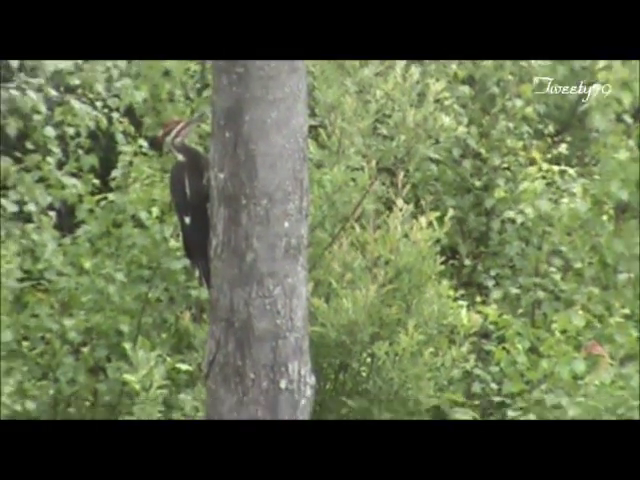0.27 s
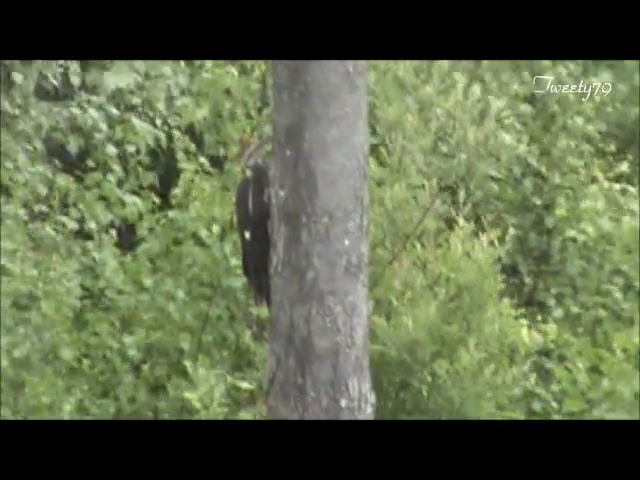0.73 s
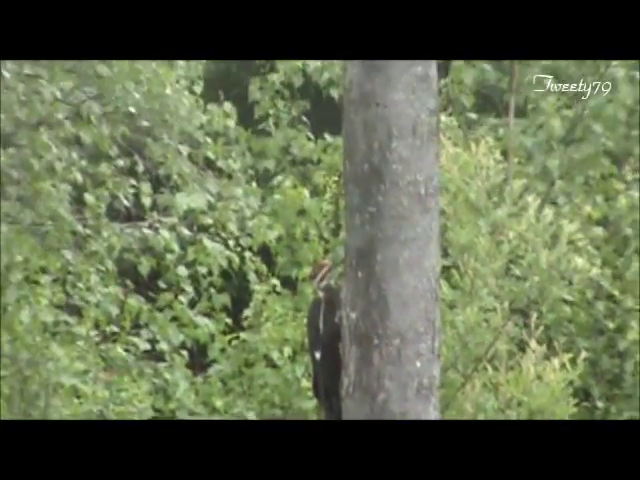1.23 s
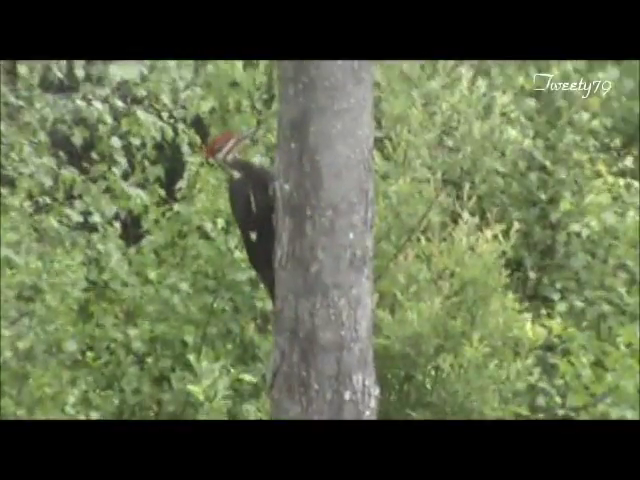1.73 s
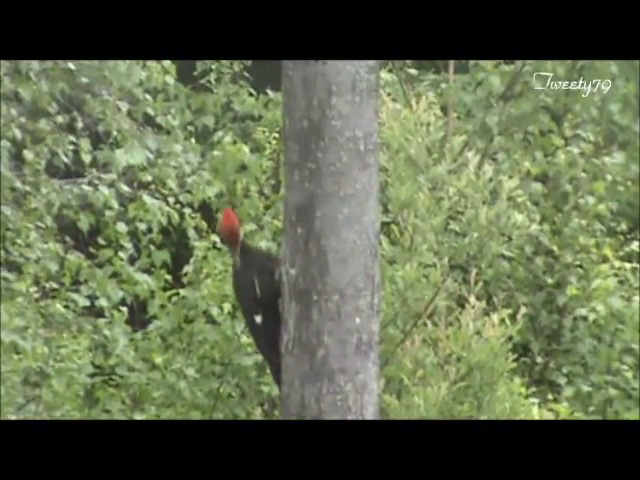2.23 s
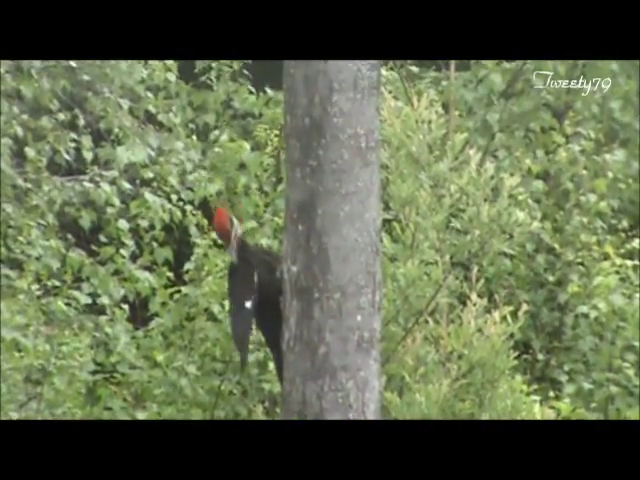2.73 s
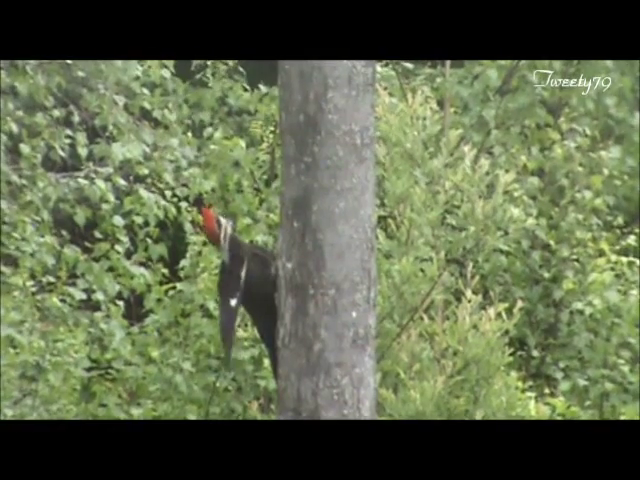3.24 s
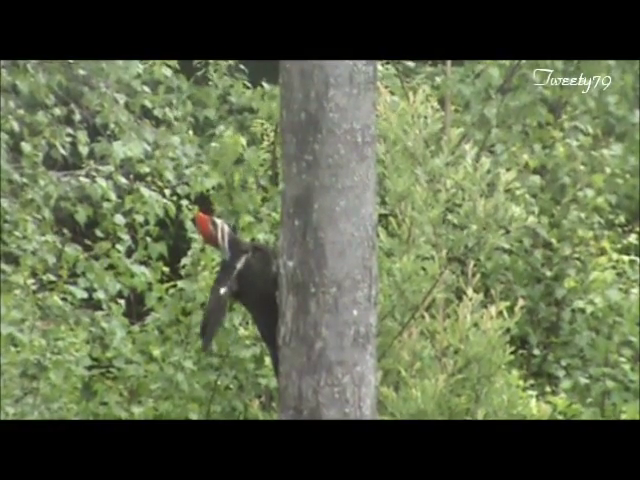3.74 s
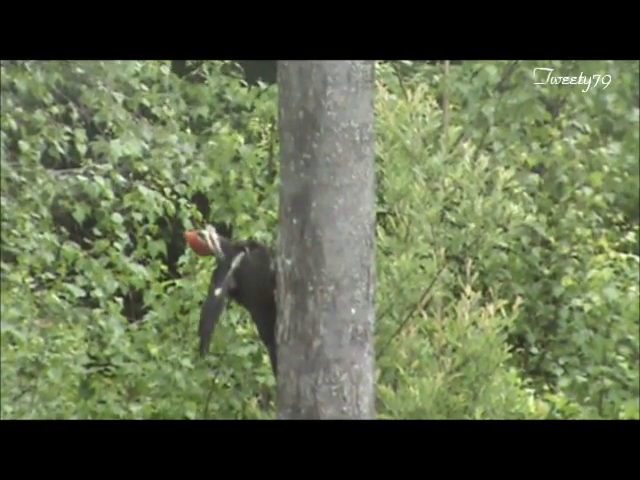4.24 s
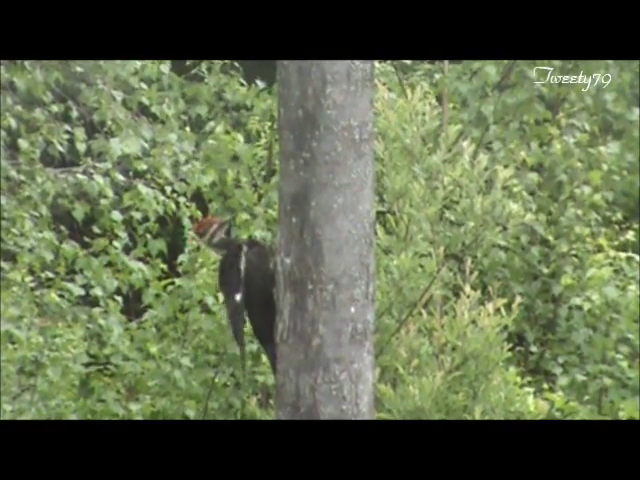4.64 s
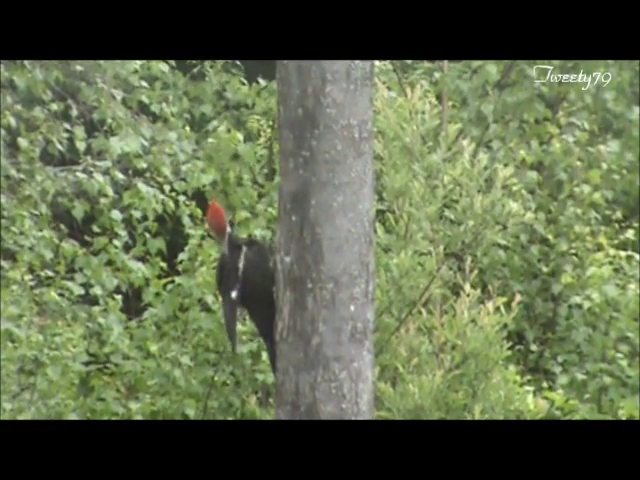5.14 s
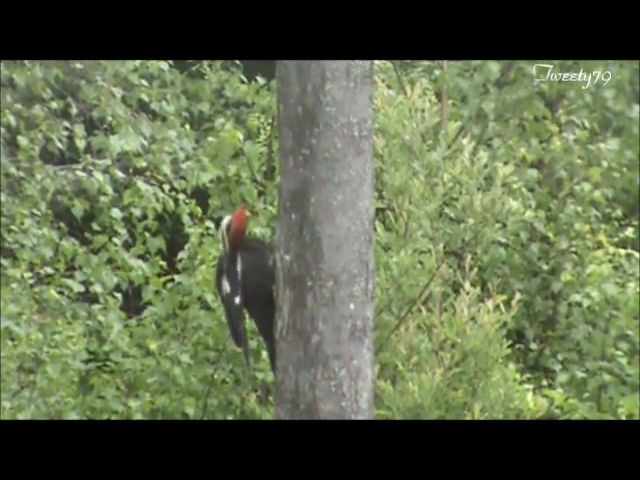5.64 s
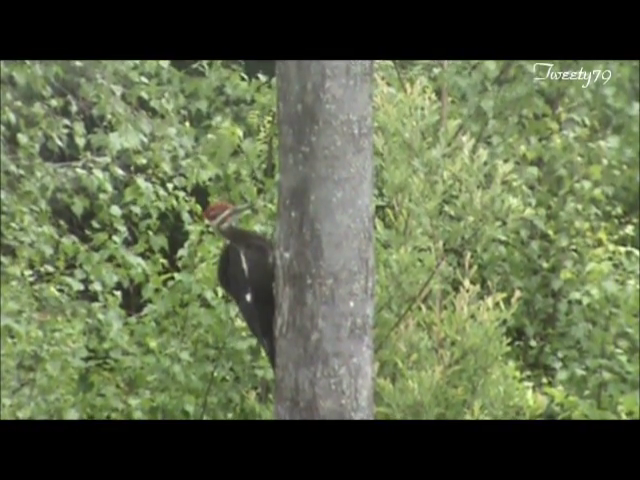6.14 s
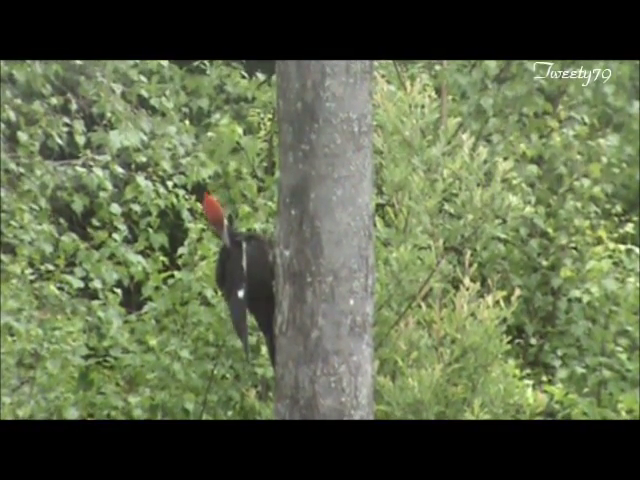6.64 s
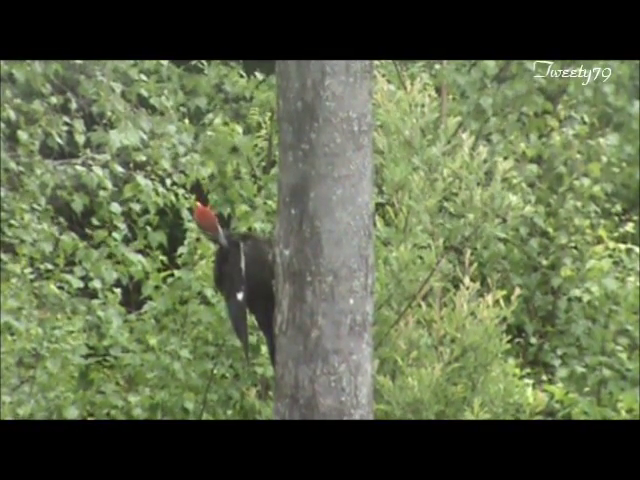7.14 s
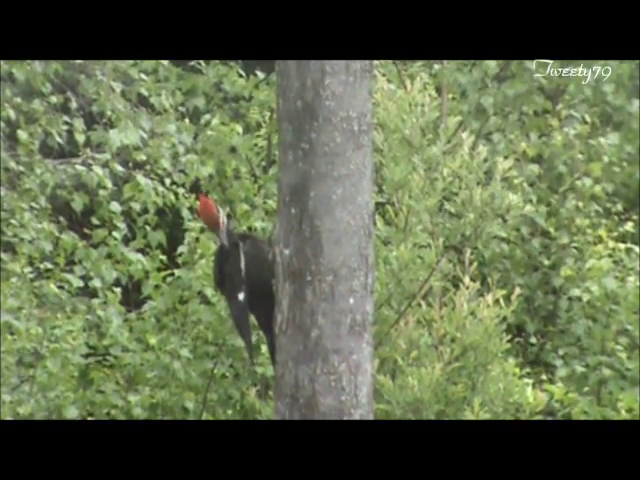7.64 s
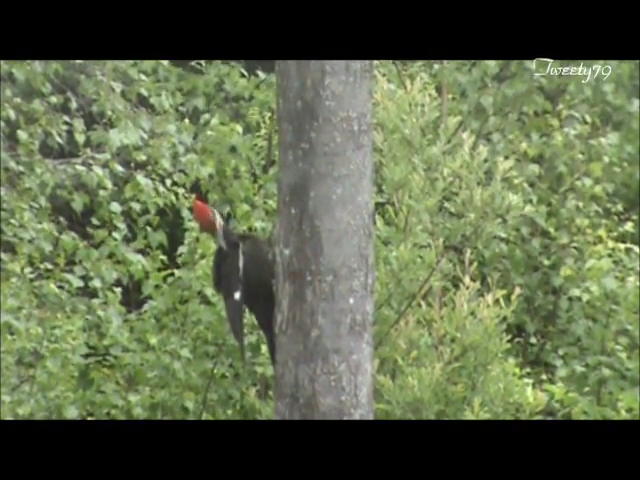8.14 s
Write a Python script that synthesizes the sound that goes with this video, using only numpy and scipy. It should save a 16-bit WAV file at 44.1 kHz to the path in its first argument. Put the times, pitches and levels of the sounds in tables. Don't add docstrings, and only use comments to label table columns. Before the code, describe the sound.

A large woodpecker gives a long run of short nasal honks that echo off the trees, over soft leaf rustle and faint distant birdsong.

```python
import sys
import numpy as np
from scipy import signal
from scipy.io import wavfile
from scipy.ndimage import uniform_filter1d, minimum_filter1d

SR = 44100
rng = np.random.default_rng(int(sys.argv[2]) if len(sys.argv) > 2 else 0)


def boost_factor(decibels):
    exponent = np.asarray(decibels, float) / 20
    return 10 ** exponent


def transcribe(signal):
    frames = np.atleast_2d(signal).T
    limited = np.clip(frames, -1, 1)
    pcm = np.round(limited * 32767).astype(np.int16)
    wavfile.write(sys.argv[1], SR, pcm)


N = 369558
LEAD_S = 0.3


def evened(x):
    return x / np.sqrt(np.mean(x ** 2) + 1e-20)


def read(points, hz):
    f, value = np.transpose(points)
    return np.interp(np.log(hz + 1), np.log(f + 1), value)


def add(mix, s, sound):
    part = mix[round(s * SR):][:len(sound)]
    part += sound[:len(part)]


def resonate(x, hz, width):
    turn = np.exp(2j * np.pi * np.cumsum(hz * np.ones(len(x))) / SR)
    r = np.exp(-np.pi * width / SR)
    return 2 * (turn * signal.lfilter([1 - r], [1, -r], x / turn)).real


def fuzzy(noise, hz, width):
    return evened(resonate(resonate(noise, hz, width), hz, width))


# time from the jump in seconds, share of the top pitch,
# fundamental level in dB, overtone level in dB.
HONK_SHAPE = [(-.024, .66, -22, -23), (-.009, .73, -16, -18), (-.003, .84, -3, -8), (.003, 1.02, 0, 0),
              (.011, 1.03, 0, 0), (.021, .975, -1, 0), (.033, .9, -3, -5), (.043, .8, -7, -8),
              (.048, .74, -28, -30)]
# multiple of the fundamental, level in dB against the second harmonic.
WEAK_OVERTONES = [(3, -24.5), (5, -36), (6, -47)]
FUNDAMENTAL_DB = -32.5
SWELL_FROM_S, SWELL_TO_S = 0.0063, 0.021
DIP_HZ, DIP_WIDTH_HZ, DIP_DB = 957.4, 8.9, -14


def honk(second_db, top_hz, fourth_db, swell_db, haste):
    shape_s, *curves = np.transpose(HONK_SHAPE)
    t = np.arange(shape_s[0], shape_s[-1], 1 / SR)
    share, first_db, over_db = (np.interp(t, shape_s, curve) for curve in curves)
    lead = haste * np.clip(-t / 0.0085, 0, 1)
    share, first_db, over_db = share + 0.04 * lead, first_db + 7 * lead, over_db + 8 * lead
    hz = top_hz * uniform_filter1d(share, 80)
    dip = np.exp(-((hz - DIP_HZ) / DIP_WIDTH_HZ) ** 2) * (t > SWELL_FROM_S)
    swelling_db = -swell_db * np.clip((SWELL_TO_S - t) / (SWELL_TO_S - SWELL_FROM_S), 0, 1)

    chance = rng.standard_normal((4, SR // 8))
    slow = evened(uniform_filter1d(uniform_filter1d(chance[:3], 60), 60))
    wobble, flutter, shimmer = slow[:, :len(t)]
    unsteady = 0.0058 + 0.015 * haste + 0.024 * np.clip((t - SWELL_TO_S) / 0.0037, 0, 1)
    turn = 2 * np.pi * np.cumsum(hz * (1 + unsteady * wobble)) / SR

    fundamental = boost_factor(first_db + FUNDAMENTAL_DB + 1.2 * flutter + 2.6 * dip) * np.sin(turn + 1.3)
    second = boost_factor(swelling_db + DIP_DB * dip) * np.sin(2 * turn)
    upper = sum(boost_factor(db) * np.sin(k * turn) for k, db in WEAK_OVERTONES)
    upper = upper * boost_factor(4.2 * shimmer + 0.63 * swelling_db)
    haze = boost_factor(-32 + 0.85 * swelling_db) * fuzzy(chance[3], 2600, 3200)[:len(t)]
    fourth_db = fourth_db - 650 * abs(t - 0.011) + 1.5 * first_db * (t < 0) + 0.61 * shimmer
    fourth = boost_factor(fourth_db) * np.sin(4 * turn)
    voice = fundamental + boost_factor(second_db + over_db) * (second + upper + haze) + fourth
    return np.sqrt(2) * voice * np.clip((t - t[0]) / 0.0024, 0, 1)


# time of the jump in seconds, second harmonic in dB, top pitch in Hz,
# fourth harmonic in dB, swell after the jump in dB.
HONKS = [(-.235, -20.5, 999, -43, 4), (0.1747, -19, 1000, -41, 9), (0.5042, -19, 1016, -44, 18),
         (0.8184, -21.5, 1000, -43, 12.5), (1.3387, -21, 1003, -45.5, 17), (2.043, -17.5, 1017, -45, 17.5),
         (2.5194, -18, 1009, -45.5, 13.5), (3.0661, -17.5, 1006, -45.5, 15.5),
         (3.4379, -18.5, 998.7, -49.5, 8), (3.8526, -17.5, 1020, -44.5, 14),
         (4.2292, -18.5, 1010, -43.5, 10.5), (4.527, -19.5, 1019, -44, 16),
         (5.2294, -19.5, 1010, -46.5, 20), (5.6635, -19.5, 988, -44.5, 8.5), (6.11, -19.5, 982.8, -44.5, 6),
         (6.529, -20, 997.6, -43.5, 8), (6.812, -21, 986, -45.5, 4.5), (6.983, -20.5, 970, -39.5, 5),
         (7.2113, -19.5, 999, -40.5, 3.5), (7.4121, -15.5, 1003, -42, 2), (7.6606, -15.5, 1001, -38.5, 7),
         (7.866, -21, 992.3, -38, 6.5), (8.070, -34.5, 995.5, -36, 8), (8.3489, -22.5, 1038, -33, 11)]


def woodpecker():
    places = np.zeros((4, N + round(LEAD_S * SR)))
    gaps = np.diff([row[0] for row in HONKS], prepend=-1)
    haste = np.clip((0.32 - gaps) / 0.0789, 0, 1)
    for k, (s, *voice) in enumerate(HONKS):
        add(places[k % len(places)], s + HONK_SHAPE[0][0] + LEAD_S, honk(*voice, haste[k]))
    return places


# pitch in Hz, width in Hz, level in dB.
NOOK = [(885, 36, 4.5), (1025, 8.3, 1.5), (1348, 100, 16), (1676, 37, 2), (1900, 4.3, -6.5),
        (1985, 20, 0.5), (2022, 22, 7), (2540, 600, -3.5), (4095, 260, 5.5)]
# frequency in Hz, time to fade by 60 dB in seconds.
WOOD_FADE = [(600, 0.28), (1000, 0.49), (2000, 0.47), (4000, 0.33), (7000, 0.23)]
# delay in seconds, level in dB.
TRUNKS = [
    (.011, -14.5),
    (.031, -11),
    (.07, -12.5),
]


def woods(x, modes, near_end_s=0.31, far_db=-13, far_t60=1.6):
    taps = rng.standard_normal((2, SR)) * (rng.random((2, SR)) < 0.1)
    hz, t, z = signal.stft(taps, SR, nperseg=128)
    near = boost_factor(-60 * t / read(WOOD_FADE, hz)[:, None])
    near = near / (1 + np.exp((t - near_end_s) / 0.047))
    far = boost_factor(far_db - 60 * t / far_t60 - 13.4 * np.log2(1 + hz / 2500)[:, None])
    tail = signal.istft(z * (near + far) * np.clip(t / 0.018, 0, 1), SR, nperseg=128)[1]
    mid, side = tail / np.linalg.norm(tail[0])
    for delay, db in TRUNKS:
        add(mid, delay * rng.uniform(0.9, 0.99), boost_factor([db]))
    mid = mid + sum(boost_factor(db) * resonate(mid, hz, width) for hz, width, db in modes)
    side = boost_factor(-14) * resonate(side, 750, 400) + boost_factor(-31) * side
    left_right = np.array([mid + side, mid - side])
    return signal.fftconvolve(x[None], left_right, axes=1)[:, :len(x)]


def gated(echo):
    gate_db, knee_db, drop_db = -46, 1.5, -8.5
    power = uniform_filter1d((echo ** 2).mean(0), 1100)
    level_db = 10 * np.log10(abs(power) + 1e-12)
    shut = 1 / (0.5 + np.exp(np.clip((level_db - gate_db) / knee_db, -30, 30)))
    return echo * boost_factor(drop_db * uniform_filter1d(shut, 200))


# frequency in Hz, level in dB per Hz.
LEAF_COLOUR = [(35, -57.5), (60, -24.5), (100, -18.5), (172, -8), (300, -9), (380, -20), (450, -16),
               (750, -20), (1000, -18.5), (1300, -28), (2000, -22.5), (2500, -29.5), (5000, -40),
               (7500, -38)]


def leaves():
    frames, hz = N // 256 + 5, np.fft.rfftfreq(1024, 1 / SR)
    a, b, c, d, patches = rng.standard_normal((frames, 513, 5)).T
    patches = evened(uniform_filter1d(uniform_filter1d(patches, 8, 0), 10, 1))
    lumps_db = (1.8 + 1.5 / (1 + (hz / 300) ** 2))[:, None] * patches
    apart_db = read([(100, -27.5), (600, -17.5), (1500, -20.5), (6000, -14.0)], hz)
    same, apart = a + 1j * b, boost_factor(apart_db)[:, None] * (c + 1j * d)
    z = np.array([same + apart, same - apart]) * boost_factor(read(LEAF_COLOUR, hz)[:, None] + lumps_db)
    return boost_factor(-65) * evened(signal.istft(z, nperseg=1024, noverlap=768)[1][:, :N])


# start in seconds, length in seconds, level in dB.
RASPS = [
    (12, 0.021, -47),
    (8.095, 0.035, -39.5),
    (.845, 0.026, -34.5),
]


def rasps(place):
    for s, length, db in RASPS:
        noise = rng.standard_normal(SR // 8)
        air = resonate(resonate(noise, 2000, 1500), 2000, 1500)[:round(length * SR)]
        add(place, s + LEAD_S, boost_factor(db) * evened(air) * np.hanning(len(air)))


# start in seconds, level in dB, pitch in Hz, time to fade by 60 dB in seconds.
KNOCKS = [(7.252, -29.5, 305, 0.24), (7.296, -43, 296, 0.56), (7.382, -33, 325, 0.28),
          (7.53, -59, 273, 0.32), (.86, -48.5, 494, 0.17), (1.317, -50, 186.7, 0.13),
          (1.478, -58.5, 255, 0.24), (2.478, -52, 182, 0.22), (5.06, -59.5, 183, 0.24),
          (6.649, -54, 284, 0.24), (8.074, -56, 300, 0.17)]


def knocks():
    out, t = np.zeros(N), np.arange(SR // 5) / SR
    for s, db, hz, t60 in KNOCKS:
        shudder = boost_factor(-60 * t / t60) * fuzzy(rng.standard_normal(len(t)), hz, 130)
        tones = np.sin(2 * np.pi * hz * t) + 0.5 * np.sin(2 * np.pi * 1.6 * hz * t)
        blow = boost_factor(3.0 - 200 * t / t60) * tones
        add(out, s, boost_factor(db) * (shudder + blow) * np.clip(t / 0.0049, 0, 1))
    return out


# start in seconds, length in seconds,
# held pitch in Hz, end pitch in Hz, level in dB.
FALLING = [(0.874, 0.039, 7000, 6800, -64), (0.964, 0.014, 4940, 4850, -59),
           (1.124, 0.046, 4664, 3460, -53), (1.164, 0.02, 3040, 2380, -62.5),
           (2.124, 0.048, 6830, 6200, -62.5), (2.33, 0.027, 6200, 4850, -56.5),
           (2.397, 0.027, 3160, 3050, -60), (2.408, 0.027, 4840, 3570, -49.5),
           (6.159, 0.031, 3220, 3010, -60.5), (7.818, 0.032, 6050, 5550, -58.5),
           (8.025, 0.018, 5000, 3900, -50)]
ARCHED = [
    (0.936, 0.041, 6060, 5900, -60.5),
    (1.043, 0.053, 5510, 4400, -58.5),
    (2.208, 0.019, 6120, 4800, -57),
    (5.806, 0.055, 6730, 5650, -60.5),
    (5.896, 0.029, 6040, 4360, -56),
    (6.029, 0.039, 5390, 4100, -55),
    (7.914, .04, 6330, 6120, -62.5),
]


def songbird():
    out = np.zeros(N)
    notes = [(0.85, *row) for row in ARCHED] + [(1.02, *row) for row in FALLING]
    for start, s, length, held_hz, end_hz, db in notes:
        u = np.arange(0, 1, 1 / (length * SR))
        path_hz = [start * held_hz, held_hz, held_hz, end_hz]
        hz = uniform_filter1d(np.interp(u, [0, 0.25, 0.6, 1], path_hz), 150)
        pure = np.sin(2 * np.pi * np.cumsum(hz) / SR)
        scattered = fuzzy(rng.standard_normal(len(u)), hz, 310)
        add(out, s, boost_factor(db) * (0.75 * pure + 0.72 * scattered) * signal.windows.tukey(len(u), 0.7))
    return out


def narrow_tones(rows, width_hz):
    out = np.zeros(N)
    for s, length, start_hz, end_hz, db in rows:
        hz = np.linspace(start_hz, end_hz, round(length * SR))
        tone = fuzzy(rng.standard_normal(len(hz)), hz, width_hz)
        add(out, s, boost_factor(db) * tone * signal.windows.tukey(len(hz), 0.4))
    return out


# start in seconds, length in seconds, start pitch in Hz, end pitch in Hz, level in dB.
BUZZES = [
    (1.162, 0.12, 3560, 3900, -64.5),
    (1.193, 0.037, 4360, 4550, -64.5),
    (2.45, 0.057, 3700, 3740, -57.5),
    (2.628, 0.18, 3910, 3800, -59),
    (2.972, 0.095, 3820, 3880, -58.5),
    (4.753, 0.13, 7360, 7000, -72.5),
    (6.16, 0.071, 3880, 3670, -65),
]


def buzzes():
    return narrow_tones(BUZZES, 280)


# time in seconds, level in dB.
DRONE = [
    (2.9, -70.5),
    (3.5, -72.5),
    (3.62, -53),
    (3.85, -53),
    (4.121, -58),
    (4.299, -65),
    (4.75, -67.5),
    (5.2, -68),
    (6.201, -79),
]


def drone():
    s, db = np.transpose(DRONE)
    level_db = np.interp(np.arange(N) / SR, s, db, -90, -90)
    air = rng.standard_normal(N)
    return boost_factor(level_db) * (fuzzy(air, 305, 16) + boost_factor(-12) * fuzzy(air, 440, 56))


# start in seconds, length in seconds, start pitch in Hz, end pitch in Hz, level in dB.
WHISTLES = [
    (6.29, 0.13, 4940, 4950, -82),
    (6.409, 0.23, 6420, 6420, -74.5),
    (6.609, 0.14, 5250, 5310, -70),
    (6.757, 0.18, 6450, 6400, -66.5),
    (7.053, 0.18, 6150, 6340, -77.5),
    (7.27, 0.11, 4580, 4580, -69.5),
]


def whistles():
    return narrow_tones(WHISTLES, 130)


def scene():
    lead = round(LEAD_S * SR)
    places = woodpecker()
    rasps(places[0])
    song = songbird() + buzzes() + whistles()
    honk_echo = gated(sum(woods(boost_factor(-14.5) * place, NOOK) for place in places))[:, lead:]
    song_echo = woods(boost_factor(2) * song, [], near_end_s=0.18)
    direct = places.sum(0)[lead:] + boost_factor(-0.5) * song
    lean = boost_factor([[0.25], [-0.25]])
    return (direct + song_echo + honk_echo + knocks() + drone()) * lean + leaves()


# start in seconds, length in seconds, sign of the peaks that wrap round.
OVERFLOWS = [(3.0885, .0005, 1), (3.4578, .0051, 1), (3.8775, .0005, -1), (3.8782, .0005, 1),
             (4.252, .0005, -1), (4.2526, .0016, 1), (7.4238, .003, 1), (7.4283, .0049, 1),
             (7.4625, .0005, 1), (7.683, .001, -1), (7.7118, .0005, 1)]


def overloaded(dry):
    clip = 0.136
    x = np.clip(dry, -clip, clip)
    peak = -minimum_filter1d(-abs(x), 30)
    for s, length, sign in OVERFLOWS:
        at = slice(round(s * SR), round((s + length) * SR))
        rail = np.minimum(3.4 * abs(x[:, at]), peak[:, at])
        x[:, at] = 0.022 * x[:, at] - 1.27 * sign * rail
    return x


def mirrored(x):
    clock = np.cos(2 * np.pi * 16000 * np.arange(N) / SR)
    jitter = 1 + 1.5 * evened(uniform_filter1d(rng.standard_normal(N), 60))
    image = 2.9 * np.gradient(x, axis=1) * clock * jitter
    image = image + boost_factor(-44.5) * rng.standard_normal(N)
    band = signal.firwin(255, [7600, 15100], pass_zero=False, fs=SR)
    return boost_factor(-54) * signal.oaconvolve(image, band[None], "same")


def band_limit(x):
    return signal.sosfilt(signal.butter(12, 15200, fs=SR, output="sos"), x)


def record(dry):
    x = overloaded(dry)
    low_cut = signal.butter(2, 95, "high", fs=SR, output="sos")
    x = signal.sosfilt(low_cut, x)[:, ::-1]
    x = signal.sosfilt(low_cut, x)[:, ::-1]
    high_cut = signal.firwin(41, 6500, window=("kaiser", 8), fs=SR)
    x = signal.oaconvolve(x, high_cut[None], "same")
    return band_limit(x + mirrored(x))


dry = scene()
out = record(dry)
transcribe(out)
```